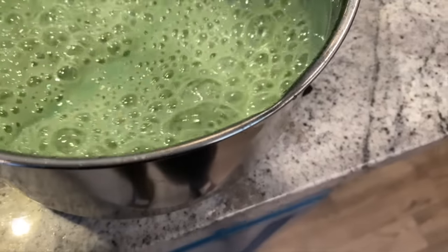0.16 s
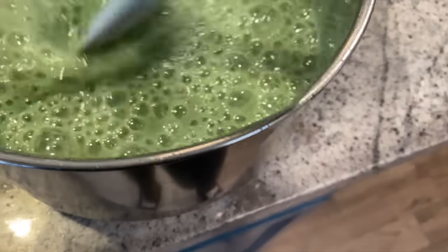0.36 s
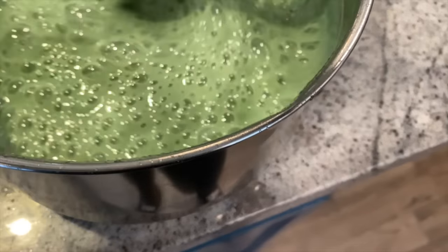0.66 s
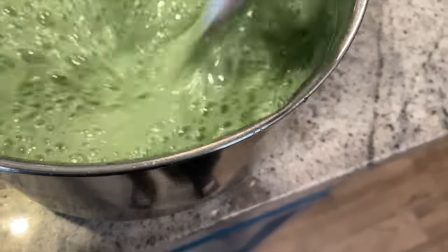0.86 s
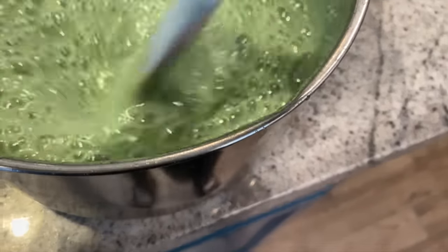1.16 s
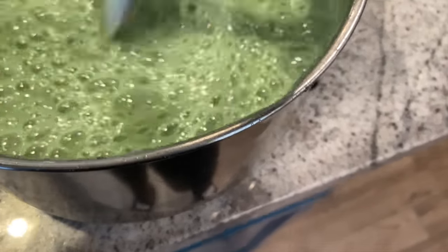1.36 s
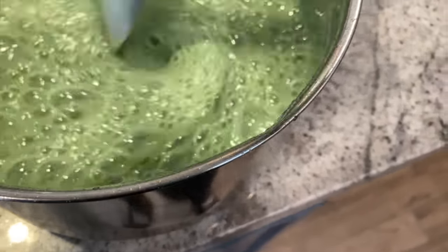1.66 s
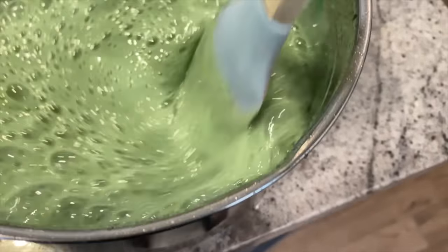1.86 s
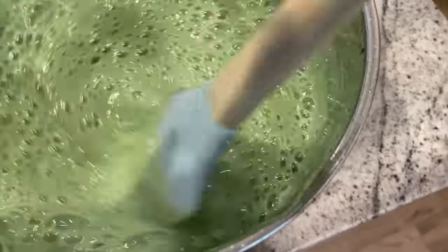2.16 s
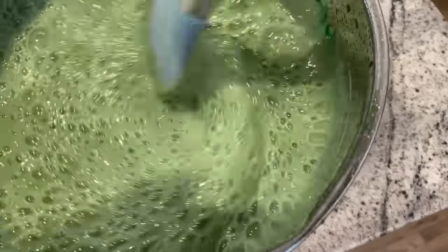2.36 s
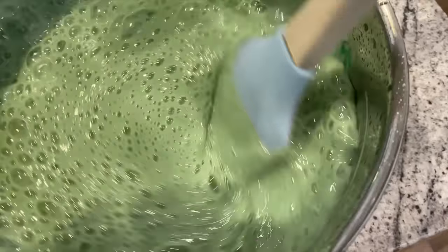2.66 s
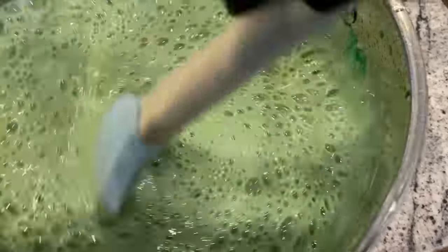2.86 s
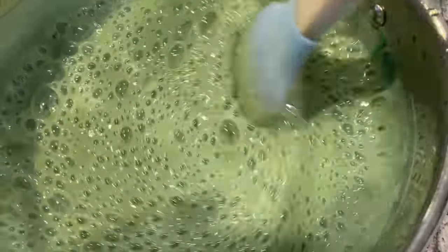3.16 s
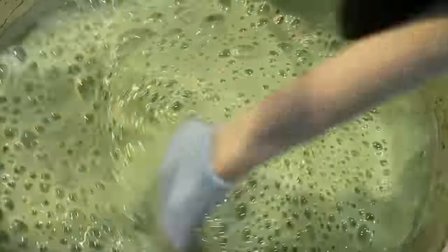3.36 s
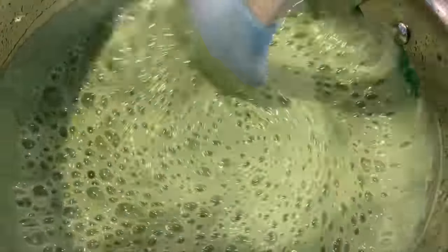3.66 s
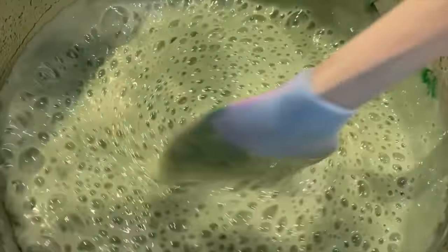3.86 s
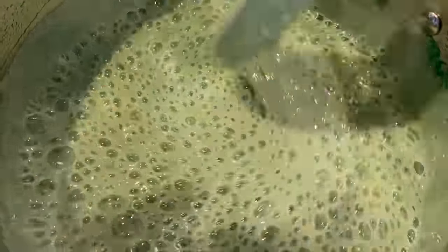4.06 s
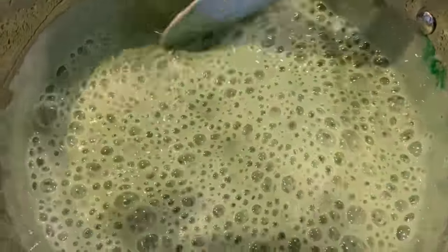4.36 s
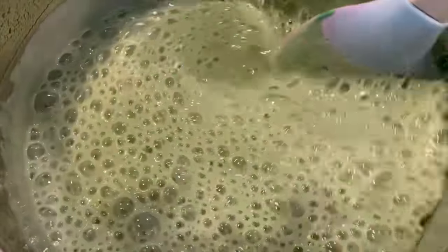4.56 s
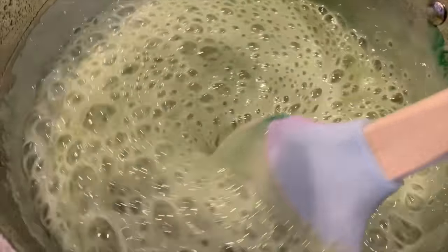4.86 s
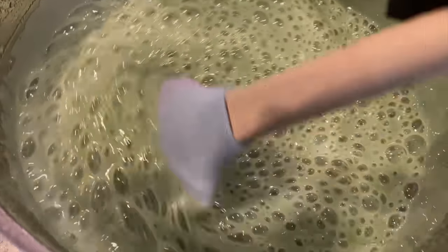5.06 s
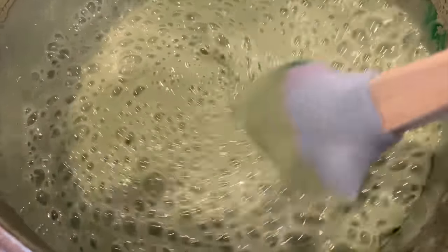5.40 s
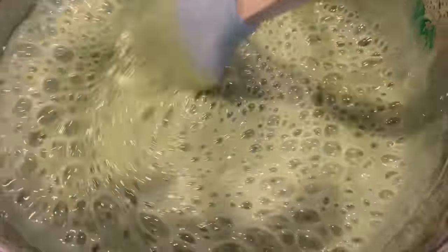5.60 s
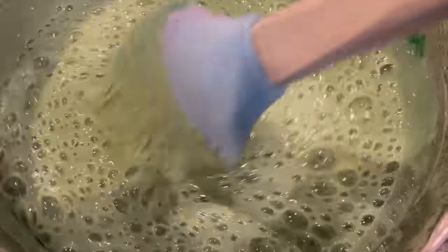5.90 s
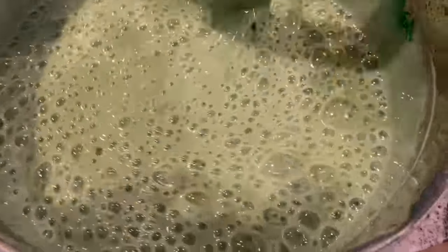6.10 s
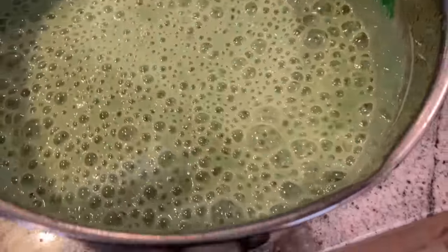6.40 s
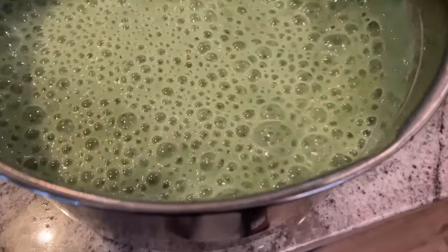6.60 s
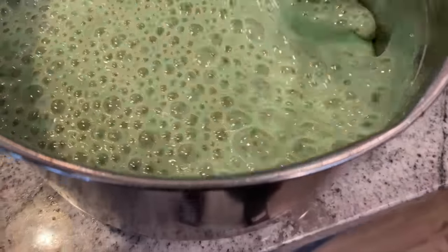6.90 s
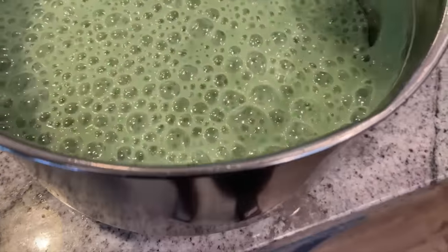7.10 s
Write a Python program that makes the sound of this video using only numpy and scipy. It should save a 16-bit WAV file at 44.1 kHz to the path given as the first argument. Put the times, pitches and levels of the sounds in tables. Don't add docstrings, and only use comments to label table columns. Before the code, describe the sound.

A soft spatula stirs thick foam in a metal pot in a small kitchen, close stereo microphone. Constant hissy fizz and soft slosh carry scattered ticks and low plops. Two short, woody-dull knocks on the wall come early, then only stirring, then one stronger knock midway and a dull nudge. Crisp bursts of popping close it over a faint low appliance hum.

```python
import sys
import numpy as np
from scipy import signal
from scipy.fft import rfft, irfft
from scipy.io import wavfile

SR = 44100
rng = np.random.default_rng(int(sys.argv[2]) if len(sys.argv) > 2 else 0)


def how_loud(loudness_db):
    steps = np.asarray(loudness_db, float) / 20
    return 10 ** steps


def master_out(mix):
    frames = np.transpose(np.atleast_2d(mix))
    ceiling = np.clip(frames, -1, 1)
    pcm = np.round(ceiling * 32767).astype(np.int16)
    wavfile.write(sys.argv[1], SR, pcm)


N = 319284


def in_time(rows):
    s, *columns = np.transpose(rows)
    return [np.interp(np.arange(N) / SR, s, c) for c in columns]


def at_hz(points, hz):
    points_hz, values = np.transpose(points)
    return np.interp(np.log(hz), np.log(points_hz), values)


def rms_one(x):
    return x / np.sqrt(np.mean(x ** 2) + 1e-20)


def band(x, low_hz, high_hz, order):
    return signal.sosfilt(signal.butter(order, [low_hz, high_hz], "band", fs=SR, output="sos"), x)


def drift(rate_hz):
    r = np.exp(-80 * np.pi * rate_hz / SR)
    slow = signal.lfilter([1], [1, -2 * r, r * r], rng.standard_normal(N // 40 + 2002))[2000:]
    return np.interp(np.arange(N) / 40, np.arange(len(slow)), rms_one(slow))


def ring(clicks, hz, t60_s):
    r = how_loud(-60 / (t60_s * SR))
    w = 2 * np.pi * hz / SR
    return signal.lfilter([0, np.sin(w)], [1, -2 * r * np.cos(w), r * r], clicks + 1e-18)


def placed(x, left_db, right_db, right_lag_s):
    return np.array([how_loud(left_db) * x, how_loud(right_db) * np.roll(x, int(right_lag_s * SR))])


def coloured(spectrum):
    # f/Hz, direct share of power
    direct = [(60, 0.25), (250, 0.92), (700, 0.23), (2000, 0.25), (5000, 0.11), (7500, 0.48), (8700, 1),
              (11000, 0.74), (14000, 0.77)]
    hz = np.fft.rfftfreq(N, 1 / SR) + 1
    inside = (hz > spectrum[0][0]) & (hz < spectrum[-1][0])
    share = np.clip(at_hz(direct, hz), 0, 1)
    common, left, right = rfft(rng.standard_normal((3, N)))
    both = np.sqrt(share) * common + np.sqrt(1 - share) * np.array([left, right])
    return rms_one(irfft(both * how_loud(at_hz(spectrum, hz)) * inside, N))


def rumble():
    # f/Hz, density/dB per Hz
    rumble_spectrum = [(15, -70.5), (25, -33.5), (35, -16), (48, -13.5), (91, -6.5), (118, -7), (145, -6.5),
                       (202, -1.5), (334, -6), (358, -3), (384, -2), (418, -13), (700, -19.5), (910, -79),
                       (1540, -120)]
    return how_loud(-57.5 - 2.5) * coloured(rumble_spectrum)


def hum():
    # f/Hz, rms level/dB, width/Hz
    tones = [(60.6, -75, 2.24), (117, -75, 1.98), (191.7, -71, 4.23), (392.4, -62.5, 2.23)]
    out = np.zeros(N)
    for hz, level_db, width_hz in tones:
        phase = 2 * np.pi * np.cumsum(hz + 0.33 * width_hz * drift(2.53)) / SR
        out += how_loud(level_db + 1.2 * drift(width_hz)) * np.sqrt(2) * np.sin(phase)
    return out


def kitchen(x):
    decays = [(141, 380, -19, 0.61, 0.92), (493, 966, -11.5, 0.51, 0.45), (1200, 2400, -9.5, 0.33, 0.29),
              (2190, 5300, -8.5, 0.19, 0.059)]
    nearest_wall_s = 0.0071
    t, tail = np.arange(SR // 2) / SR, 0
    for low_hz, high_hz, level_db, t60_s, common in decays:
        noise, share = rng.standard_normal((3, len(t))), np.clip(common, 0, 1)
        noise = np.sqrt(share) * noise[0] + np.sqrt(1 - share) * noise[1:]
        tail = tail + how_loud(level_db - 60 * t / t60_s) * band(noise, low_hz, high_hz, order=3)
    tail = tail * np.clip(t / nearest_wall_s, 0, 1) ** 3 * how_loud(-25.0)
    return signal.fftconvolve(tail, x[None], axes=1)[:, :N]


def in_pot(x):
    # lag/s, level/dB
    pot_echoes = [
        [(.0011, -15.5), (.0025, -12), (.0052, -18)],
        [(.0007, -15), (.0021, -13.5), (.0047, -45)],
    ]
    dull, out = band(x, 500, 6500, order=3), x.copy()
    for port, echoes in enumerate(pot_echoes):
        for k, (lag_s, echo_db) in enumerate(echoes):
            out[port] += (-1) ** k * how_loud(echo_db) * np.roll(dull[port], int(lag_s * SR))
    return out


def struck(modes, column, lag_s, hardening=0):
    # t/s, peak level/dB, wall ring/dB, base thud/dB, counter boom/dB
    blows = [
        (0.054, -36.5, -16, -3, 4),
        (0.7038, -33, -4, -14, -30),
        (0.7103, -20, 1, -6, -11),
        (1.038, -26.5, 3, -5, -10),
        (4.3569, -30, -5, -10, -28),
        (4.3627, -16, 5.5, -2.5, -7.5),
        (4.9248, -29, -23, -11.5, -11),
    ]
    rows, out = np.array(blows), np.zeros(N)
    starts = ((rows[:, 0] + lag_s) * SR).astype(int)
    peak_db = rows[:, 1]
    for hz, level_db, t60_s in modes:
        strength_db = peak_db + rows[:, column] + level_db
        strength_db += 1.5 * rng.standard_normal(len(rows))
        strength_db += hardening * (peak_db - peak_db.max())
        clicks = np.zeros(N)
        clicks[starts] = how_loud(strength_db)
        out += ring(clicks, hz, t60_s)
    return out


def bumps():
    # f/Hz, level/dB, t60/s
    wall_modes = [(850, -4, 0.0097), (700.4, -21.5, 0.12), (1035, -7, 0.032), (1089, -0.5, 0.018),
                  (1360, -35, 0.0093), (1790, -1.5, 0.014), (1970, -69, 0.013), (2800, -5.5, 0.0033),
                  (3890, -24, 0.013), (5460, -8.5, 0.0057), (6530, -27, 0.022)]
    # f/Hz, level/dB, t60/s
    base_modes = [(155, -27, 0.08), (210, -8, 0.049), (248, 3, 0.014), (335, 13, 0.015), (423, -18, 0.011)]
    # f/Hz, level/dB, t60/s
    counter_modes = [(58.8, -7.5, 0.31), (125, -6.5, 0.25)]
    crack = band(struck(wall_modes[7:], column=2, lag_s=0, hardening=0.83), 2800, 7400, order=2)
    body = struck(wall_modes[1:5], column=2, lag_s=0)
    rim = struck(wall_modes[5:7], column=2, lag_s=0.0016, hardening=2.3)
    wall = band(body + rim, 550, 2120, order=3)
    base = struck(base_modes[2:], column=3, lag_s=0.0019, hardening=0.21)
    base_low = struck(base_modes[:2], column=3, lag_s=0.0055, hardening=-0.71)
    thud = band(base + base_low, 172, 495, order=2)
    boom = band(struck(counter_modes, column=4, lag_s=0.0079), 53.6, 108, order=3)
    flank = band(struck(wall_modes[:1], column=2, lag_s=0), 415, 1300, order=2)
    near = placed(crack + wall, 1, -3, -0.00004)
    return (near + placed(flank, 1.5, 0.5, 0.00095) + placed(thud, -2.7, -6.0, 0.00014)
            + placed(boom, 0.5, -1.3, 0.0016))


def bursts(events, cycles, tear_db, trim_db, size):
    out, t = np.zeros((2, N + size)), np.arange(size) / SR
    for (s, peak_db, hz, pan_db), noise in zip(events, rng.standard_normal((len(events), size))):
        turns = hz * t
        cavity = np.sin(2 * np.pi * turns) * turns / cycles * np.exp(1 - turns / cycles)
        rip = np.convolve(noise, np.ones(int(SR / hz / 4) + 1), "same")
        tear = how_loud(tear_db) * rip * np.exp(-turns / (2.7 * cycles))
        tear *= np.tanh(turns / 1.45)
        side = how_loud([[pan_db / 2], [-pan_db / 2]])
        start = int(s * SR)
        out[:, start:start + size] += how_loud(peak_db + trim_db) * (cavity + tear) * side
    return out[:, :N]


def one_size(rows, hz, scatter):
    pitch = hz * (1 + scatter * np.clip(rng.standard_normal(len(rows)), -2, 2))
    return [(row[0], row[1], p, sum(row[2:])) for row, p in zip(rows, pitch)]


def large_bubbles():
    # t/s, peak level/dB, f/Hz, left-right/dB
    plops = [(0.125, -45.5, 1580, 19), (0.155, -43, 1790, -9), (0.243, -47.5, 440, 4), (0.29, -44, 905, -3),
             (0.303, -50, 700, 0), (0.336, -54, 420, 4), (0.495, -47, 1550, 2), (1.421, -38.5, 1310, 2.0),
             (2.114, -39.5, 1150, 1.5), (2.578, -47, 1280, 9), (2.649, -43, 1830, 5),
             (3.505, -42, 1800, 12), (4.193, -45.5, 1130, -9), (4.48, -37.5, 990, -2),
             (4.925, -36.5, 1560, -3), (5.518, -46, 1300, 2), (5.659, -45, 1260, -2),
             (6.25, -49, 1200, -23), (6.961, -43, 1470, -4), (7.008, -44, 1360, -9)]
    return band(bursts(plops, cycles=1.0, tear_db=-8.5, trim_db=-1.5, size=1200), 190, 3500, order=2)


def popping_skins():
    # t/s, peak level/dB, f/Hz, left-right/dB
    skin_pops = [(0.4958, -34.5, 4400, 7), (0.6028, -39, 5100, 1.5), (0.621, -39, 5250, 17),
                 (0.6659, -34.5, 4800, 3), (0.9666, -38.5, 5030, 17), (1.8624, -32, 7940, -1),
                 (1.965, -31.5, 4800, 0), (2.0177, -38, 6540, -11), (2.0286, -33, 4430, 13),
                 (2.127, -37.5, 5900, 31), (2.526, -38, 6300, -15), (2.6072, -37, 8400, 11),
                 (3.4732, -39, 6550, -12), (3.6002, -38, 4230, 7), (4.4321, -36, 5500, -4),
                 (4.4645, -34.5, 6940, -16), (4.519, -34.5, 7450, -6), (4.982, -36.5, 7300, -11),
                 (5.3232, -26, 8900, 0), (5.483, -27, 6170, -11.5), (5.5333, -38, 6900, -14),
                 (5.6715, -30, 6600, -9.5), (5.7242, -33.5, 4200, -3), (6.414, -31, 6530, 4),
                 (6.4278, -27.5, 9050, 8), (6.4539, -36, 4700, -6), (6.6802, -38, 4850, 13),
                 (6.8437, -37.5, 7300, -6), (6.9628, -30.5, 6300, 6), (7.0173, -36.5, 5000, 24),
                 (0.0865, -46, 4000, 1.5), (0.2194, -46, 4680, -4), (0.2922, -45, 3600, 5),
                  (0.6525, -41, 4870, 2.0), (0.7192, -35, 4600, 2.0), (0.8624, -53, 4240, 0.5),
                  (0.89, -52, 4720, -1.0), (1.3927, -54, 3470, 5), (1.67, -53, 4280, 2.5),
                  (1.73, -40, 4300, 2), (1.951, -49, 4700, -2.5), (2.0847, -46, 4430, -1.0),
                  (2.2089, -47, 3920, 5), (2.34, -49, 3950, -1.0), (2.4987, -44, 3350, 4),
                  (2.5681, -48, 4060, 1), (2.7342, -52, 4220, -0.5), (3.039, -43, 3240, 5),
                  (3.0674, -37, 3780, 0.0), (3.1283, -38.5, 3100, -2.0), (3.2933, -40.5, 4500, 1),
                  (3.3356, -46, 3040, 1), (3.3553, -48, 4480, 0), (3.4096, -43, 7910, -1.5),
                  (3.446, -40, 3350, 5), (4.0644, -48, 3320, -1), (4.12, -47, 3090, 1),
                  (4.1445, -46, 3390, 1), (4.3106, -60, 4250, 1), (4.4528, -33, 6660, -2.0),
                  (4.582, -46, 4490, -1.5), (4.755, -49, 4220, -2.0), (5.4215, -47, 3620, 2),
                  (5.6, -46, 4090, -1), (5.6828, -37, 4630, 5), (5.6974, -38, 5560, -1.5),
                  (5.742, -44, 3290, -1.5), (6.0176, -45, 3780, -0.5), (6.2168, -44, 3500, 6),
                  (6.3055, -47, 4230, 1), (6.3649, -55, 3610, -0.5), (6.4015, -34, 6430, 2),
                  (6.4798, -43, 3080, -1.0), (6.565, -53, 3900, 1), (6.6662, -48, 4150, -4),
                  (6.724, -41, 3700, 0.0), (7.0468, -41, 4710, 0.5), (7.0753, -40, 4970, -2),
                  (7.1921, -45.5, 4970, 18)]
    # t/s, peak level/dB, left-right/dB
    cells = [(0.0554, -39.5, -1), (0.1247, -40, -16.5), (0.154, -51, 22), (0.4843, -44, 8), (1.273, -50, 8),
             (1.333, -42, 10), (1.5495, -44.5, 13), (1.8822, -44, 6), (2.2586, -45, 13), (2.6509, -43, 1.5),
             (2.6663, -37.5, -2), (2.9976, -39.5, 3), (3.0585, -42.5, 10), (3.2037, -48, 2),
             (3.489, -42, 17), (3.5334, -43, -18), (4.1938, -40, 13), (4.364, -36, 12), (4.6698, -36.5, 4),
             (4.8693, -44, -7), (5.191, -40.5, -1), (5.5179, -55, 5), (6.247, -38, 0), (6.7392, -42, 1)]
    # t/s, peak level/dB
    ticks = [(0.125, -54), (0.1513, -46.5), (0.2184, -49), (0.2928, -47.5), (0.4505, -53), (0.6659, -60),
             (0.816, -50), (0.9647, -45.5), (1.297, -49), (1.3329, -40.5), (1.426, -36.5), (1.6302, -54),
             (1.729, -47), (1.8826, -43), (2.1274, -49), (2.1834, -39), (2.1856, -42), (2.2077, -43.5),
             (2.34, -45), (2.3534, -43.5), (2.5, -43), (2.5247, -46.5), (2.6063, -40), (2.8355, -47),
             (3.0576, -41), (3.088, -42), (3.128, -43), (3.1707, -48), (3.2794, -46), (3.41, -39.5),
             (3.4722, -40), (3.6, -38), (4.0417, -47.5), (4.2048, -45), (4.362, -52), (4.414, -54),
             (4.431, -41.5), (4.6925, -49), (4.8182, -47.5), (4.9077, -49), (4.925, -35), (5.2469, -42),
             (5.321, -48), (5.4814, -53), (5.5328, -38.5), (5.5715, -45), (5.8718, -45), (5.9293, -48),
             (6.118, -54), (6.1344, -43.5), (6.2357, -55), (6.34, -59), (6.4278, -54), (6.7027, -55),
             (6.8256, -44.5), (6.8698, -55), (7.017, -58), (7.018, -41), (7.0459, -46), (7.1925, -54)]
    skins = [*skin_pops, *one_size(cells, hz=3350, scatter=0.07)]
    pops = bursts(skins, cycles=1.26, tear_db=-7.0, trim_db=-0.5, size=400)
    fine = bursts(one_size(ticks, hz=9440, scatter=0.091), cycles=3.47, tear_db=4.0, trim_db=3.0, size=300)
    return band(pops, 820, 13200, order=2) + band(fine, 5900, 11000, order=2)


def swarm(spectrum, per_s, cycles, spread_db, clump_db, place_db, count):
    sizes = how_loud(spread_db * np.minimum(rng.exponential(1, N), 2.1)) * rng.choice([-1, 1], N)
    born = rng.random(N) < per_s * how_loud(clump_db * drift(14)) / SR
    dealt = rng.integers(0, count, N)
    place = how_loud(rng.uniform(-1.11, 1, N) * [[place_db], [-place_db]])
    out = np.zeros((2, N))
    for k, hz in enumerate(np.geomspace(spectrum[0][0], spectrum[-1][0], count)):
        once = ring(sizes * born * (dealt == k) * place, hz, cycles / hz)
        out += how_loud(at_hz(spectrum, hz)) * hz ** 2 * ring(once, hz, cycles / hz)
    return rms_one(out)


def crackle(fizz_db):
    per_s = 110
    sizes = how_loud(4.5 * np.minimum(rng.exponential(1, N), 2.2)) * rng.choice([-1, 1], N)
    born = rng.random(N) < per_s * how_loud(0.8 * (fizz_db - fizz_db.mean())) / SR
    place = how_loud(rng.normal(0, 1, N) * [[2.5], [-2.5]])
    return rms_one(band(sizes * born * place + 1e-18, 3600, 11300, order=2))


def swarm_rises():
    # t/s, half length/s, rise/dB, fineness (-1 coarse to 1 fine)
    swarms = [(0.34, 0.041, 4.5, -0.34), (0.501, 0.023, 7.5, -0.021), (1.083, 0.023, 3, 0.91),
              (1.426, 0.018, 4, -0.97), (2.087, 0.021, 6, -0.18), (2.237, 0.042, 4, -0.3),
              (2.617, 0.074, 3.5, -0.46), (3.054, 0.056, 5.5, -0.17), (3.333, 0.033, 6, 0.095),
              (3.524, 0.037, 9.5, -0.0098), (4.138, 0.049, 3, 1), (4.202, 0.0036, 7, -1.2),
              (4.475, 0.013, 7.5, .9), (4.934, 0.0074, 15, -0.11), (4.952, 0.008, 15.5, 0.49),
              (5.25, 0.036, 3.5, -0.33), (5.53, 0.007, 8, 0.091), (5.712, 0.041, 5, -0.43),
              (6.252, 0.0083, 12, -0.52), (6.43, 0.024, 15, 0.54), (6.73, 0.022, 4.5, 1),
              (7.016, 0.0066, 18, 0.064), (7.208, 0.012, 8.5, 1)]
    t, rises_db = np.arange(N) / SR, np.zeros((3, N))
    for s, half_s, db, fine in swarms:
        bell = np.exp(-((t - s) / max(half_s, 0.004)) ** 2)
        rises_db += np.outer([db, db * (1 - fine), db * 1.27 * (1 + 0.57 * fine)], bell)
    return rises_db


def foam_levels():
    # t/s, vigour as fizz level/dB, extra fine froth/dB
    stir = [(0.0, -64, -7), (0.58, -59, -2), (0.89, -61, 2), (1.39, -61.5, 2), (1.49, -62.5, 3),
            (1.77, -60, -9), (2.06, -60.5, 1.5), (2.92, -60, 5.5), (3.23, -59, 5), (4.11, -61.5, 5.5),
            (4.49, -56.5, -7), (4.74, -61, 1), (5.57, -60, 2.5), (6.01, -63.5, -1), (6.92, -63, -9),
            (7.24, -67.5, 9)]
    vigour_db, fine_db = in_time(stir)
    swing_db = vigour_db + 60.5
    slosh_db = -65.5 + 0.99 * swing_db
    froth_db = -74.5 + 1.4 * swing_db + fine_db
    return np.array([vigour_db, slosh_db, froth_db]) + swarm_rises()


def foam():
    # f/Hz, density/dB per Hz
    fizz_spectrum = [(1800, -10), (2600, 1), (3500, 1.5), (5000, 1), (6500, -2.5), (8000, -3), (8700, -8),
                     (9500, -7), (11000, -24)]
    # f/Hz, density/dB per Hz
    froth_spectrum = [(9000, 10.5), (10500, 3), (12000, -12), (13000, -16), (14000, -16), (15500, -5.5),
                      (16500, -39.5)]
    # f/Hz, density/dB per Hz
    slosh_spectrum = [(260, -18), (450, -5.5), (752, -2), (878, -5.5), (1340, 1.5), (1720, -2),
                      (1940, -3.5), (2600, -13), (3380, -37), (5720, -120)]
    fizz_db, slosh_db, froth_db = foam_levels()
    seethe = how_loud(2.22 * drift(81))

    prickle = swarm(fizz_spectrum, 1500, 5.5, 8.5, 4.0, 13.0, count=14)
    fizz = how_loud(0.5) * coloured(fizz_spectrum) + how_loud(1.0) * in_pot(prickle)
    fizz = fizz + how_loud(-15.5) * in_pot(crackle(fizz_db))
    fizz = band(fizz, 2080, 12300, order=2)

    sparkle = swarm(froth_spectrum, 1200, 14, 5, 5, 0.5, count=9)
    froth = how_loud(-3.0) * coloured(froth_spectrum) * how_loud(4.9 * drift(18)) + how_loud(3.5) * sparkle
    froth = band(froth, 8300, 22000, order=2)

    gurgle = in_pot(swarm(slosh_spectrum, 400, 6, 2.5, 3, 3, count=10))
    slosh = how_loud(1.5) * coloured(slosh_spectrum) + how_loud(-7.5) * gurgle
    return seethe * (how_loud(fizz_db - 0.5) * fizz + how_loud(froth_db + 2.0) * froth + how_loud(slosh_db + 0.5) * slosh)


def scene():
    floor = rumble() + hum()
    knocks = bumps()
    bubbles = popping_skins() + large_bubbles()
    room = kitchen((knocks + how_loud(-0.5) * bubbles).mean(axis=0))
    return foam() + in_pot(bubbles) + knocks + room + floor


def band_limit(x):
    return signal.sosfilt(signal.butter(12, 16630, fs=SR, output="sos"), x)


def record(dry):
    # f/Hz, left lead/rad
    port_phase = [(0, 0), (1210, -1.3), (1460, -1.2), (2580, -9.9), (3960, -13.0), (6800, -17.1),
                  (8180, -16.2), (9470, -15.0), (10700, -12.7), (12400, -12.2), (13200, -9.5),
                  (14100, -9.2), (15100, -6.4), (16200, -6.3)]
    hz = np.fft.rfftfreq(N, 1 / SR)
    points_hz, lead_rad = np.transpose(port_phase)
    right = irfft(rfft(dry[1]) * np.exp(-1j * np.interp(hz, points_hz, lead_rad)), N)
    top_cut = signal.cheby2(10, 50, 16600, fs=SR, output="sos")
    mix = signal.sosfilt(top_cut, np.array([dry[0], right]))
    return band_limit(mix)


dry = scene()
out = record(dry)
master_out(out)
```